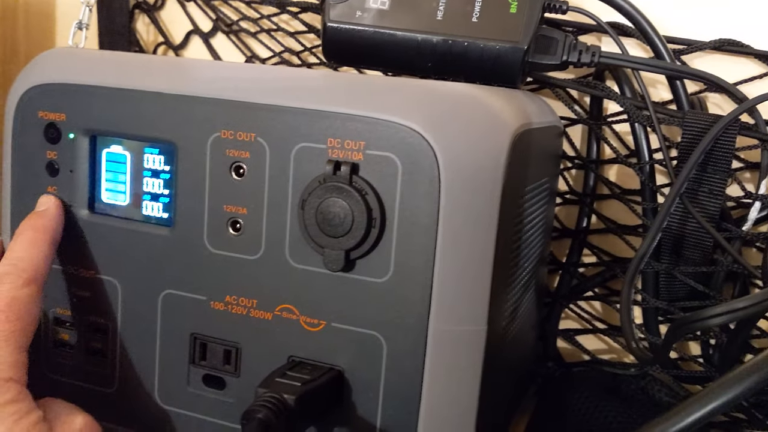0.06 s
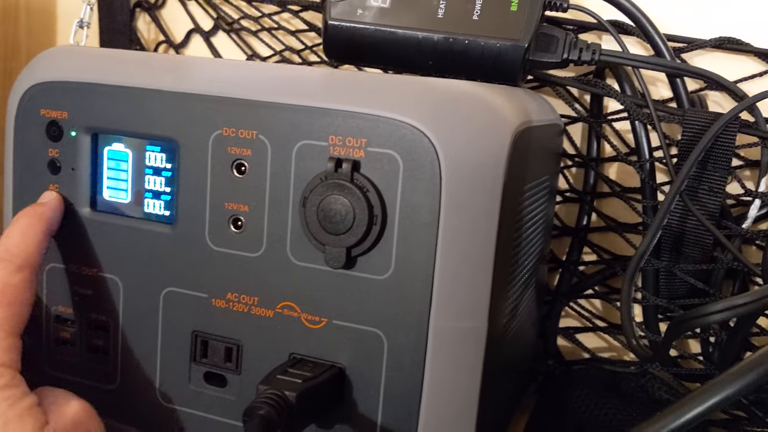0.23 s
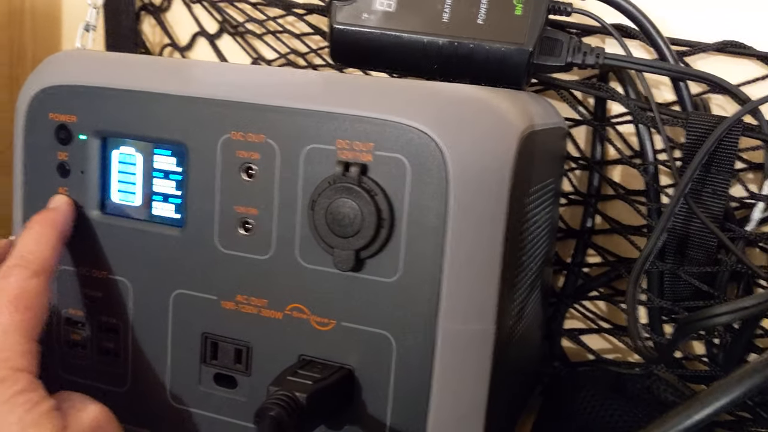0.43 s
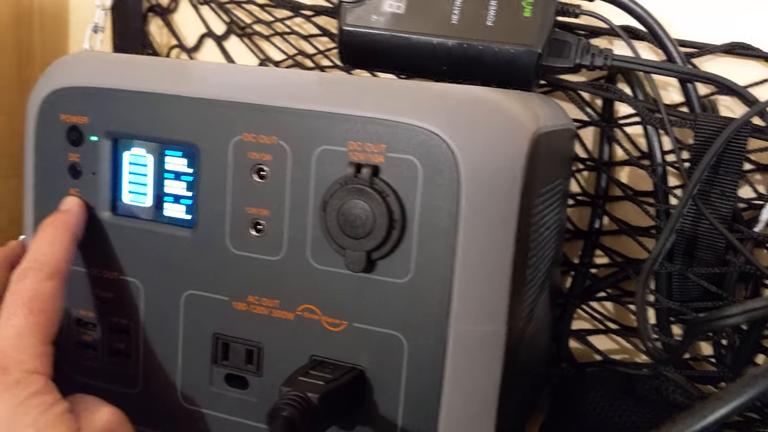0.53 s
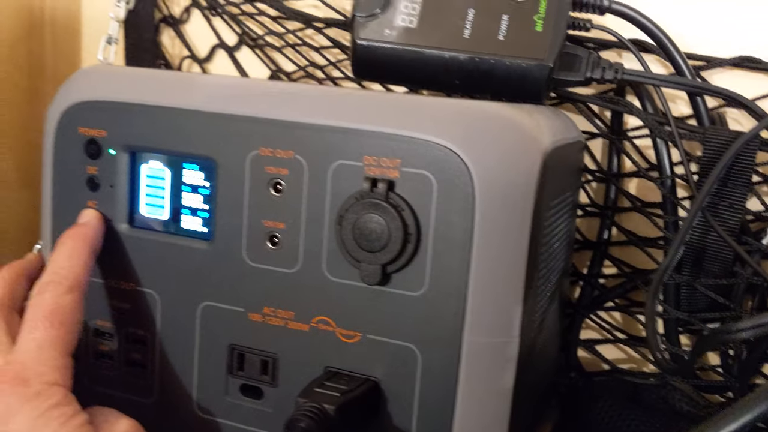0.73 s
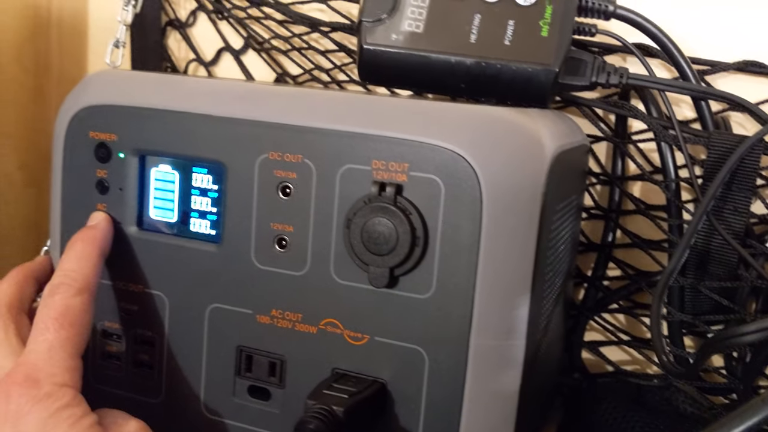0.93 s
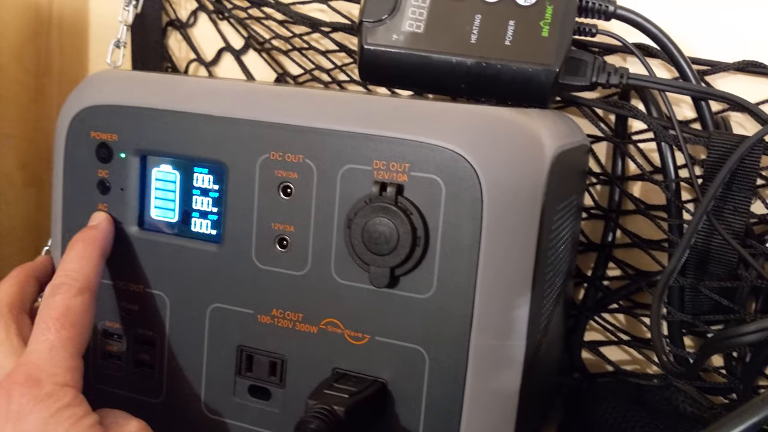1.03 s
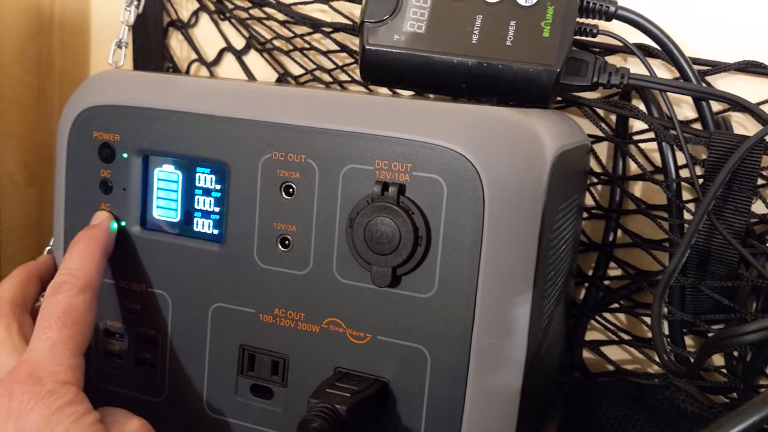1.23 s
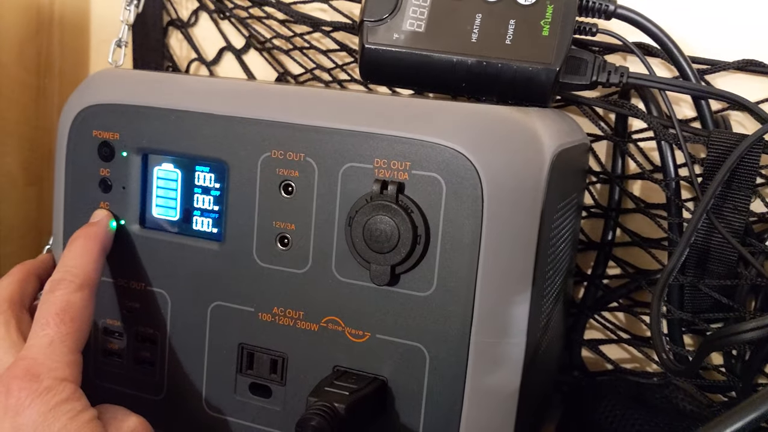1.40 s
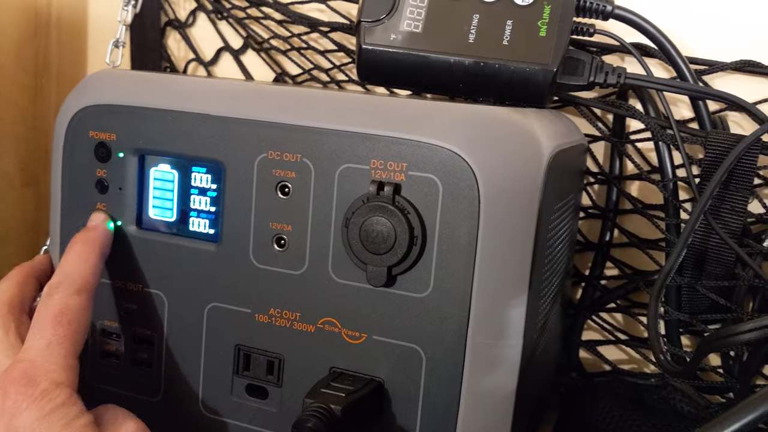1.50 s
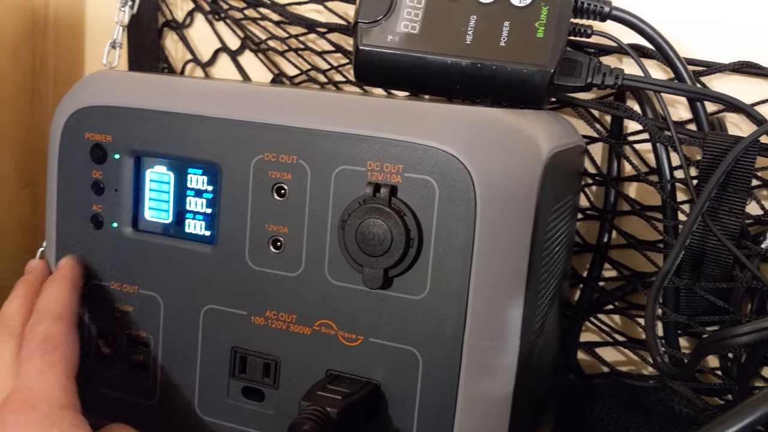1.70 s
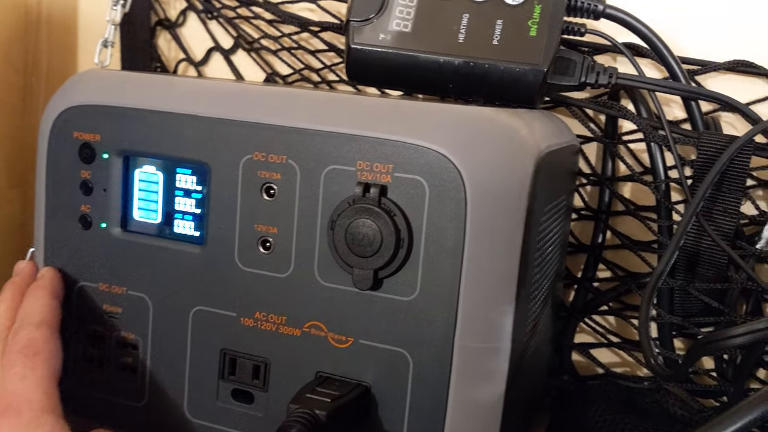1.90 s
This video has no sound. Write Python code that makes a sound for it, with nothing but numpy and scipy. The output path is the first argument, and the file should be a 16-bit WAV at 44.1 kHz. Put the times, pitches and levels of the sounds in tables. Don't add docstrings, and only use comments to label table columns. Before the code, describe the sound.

Close stereo pickup of a button on a hollow plastic battery box: one strong sharp click early, faint finger taps, then a brighter double click with tiny chatter, over quiet hum, fan air and hiss in a small cabin.

```python
import sys
import numpy as np
from scipy import signal
from scipy.io import wavfile
from scipy.ndimage import uniform_filter1d

SR = 44100
rng = np.random.default_rng(int(sys.argv[2]) if len(sys.argv) > 2 else 0)


def linear_from_db(decibels):
    return 10 ** (np.asarray(decibels, float) / 20)


def master(y):
    cut = np.clip(np.atleast_2d(y).T, -1, 1)
    pcm = np.round(cut * 32767)
    wavfile.write(sys.argv[1], SR, pcm.astype(np.int16))


N = 85995
EDGE_HZ = 15850
PORT_SIGNS = np.array([[1], [-1]])

# f/Hz, left minus right level/dB
STRUCK_TILT = [(200, -2), (700, 0.33), (1400, -0.5), (2800, 0.5), (4500, 0.5), (9000, -6), (14000, 0.5)]
# f/Hz, correlation [0 to 1]
PORT_LIKENESS = [(60, 0.9135), (150, 0.5071), (380, 0.9768), (950, 0.0442), (2380, 0.0242), (5980, 0.042),
                 (15000, 0.017)]


def evened(x):
    return x / np.sqrt(np.mean(x ** 2) + 1e-20)


def read(points, hz):
    f, value = np.transpose(points)
    return np.interp(np.log(hz + 1), np.log(f + 1), value)


def curve(points):
    s, value = np.transpose(points)
    return np.interp(np.arange(N) / SR, s, value)


def add(mix, s, sound):
    part = mix[..., round(s * SR):][..., :sound.shape[-1]]
    part += sound[..., :part.shape[-1]]


def noise(shape, size, patchy_db, alike):
    # f/Hz, left minus right level/dB
    port_tilt = [(60, 1), (180, -3.5), (550, -.5), (1650, -2.5), (4970, -3.5), (15000, -7.5)]
    air_lag_s = .0001
    frames, hz = 4 * N // size + 5, np.fft.rfftfreq(size, 1 / SR)
    a, b, c, d, patches = rng.standard_normal((frames, len(hz), 5)).T
    patches = uniform_filter1d(patches, size=9, axis=0)
    patches = evened(uniform_filter1d(patches, size=9, axis=1))

    same = np.clip(alike * read(PORT_LIKENESS, hz), -1, 1)[:, None]
    left = a + 1j * b
    right = same * left + np.sqrt(1 - same ** 2) * (c + 1j * d)
    right = right * np.exp(2j * np.pi * air_lag_s * hz)[:, None]

    tilt = linear_from_db(read(port_tilt, hz) / 2)[:, None]
    outside = (hz < shape[0][0]) | (hz > shape[-1][0])
    gain = linear_from_db(read(shape, hz) - 60 * outside)[:, None] * linear_from_db(patchy_db * patches)
    spectra = np.array([left * tilt, right / tilt]) * gain
    return evened(signal.istft(spectra, nperseg=size, noverlap=3 * size // 4)[1][:, :N])


def ring(hz, db, t60, rise, turn, bend=1):
    # f/Hz, delay of each port either way/s
    mode_lag = [(210, .00009), (400, -.00005), (750, -.00016), (1300, -.00024), (2600, .00013),
                (4400, -.0002)]
    lag = read(mode_lag, hz) * PORT_SIGNS
    t = np.maximum(np.arange(SR // 8) / SR - np.maximum(lag, 0), 0)
    tilt = linear_from_db(read(STRUCK_TILT, hz) / 2 * PORT_SIGNS)
    decay = linear_from_db(db - 60 * (t / t60) ** bend)
    onset = (1 - np.exp(-t / rise)) ** 2
    return tilt * decay * onset * np.sin(2 * np.pi * (hz * t + turn))


def crack(bright_db):
    # f/Hz, level/dB per Hz
    crack_spectrum = [(700, -17), (1250, -13.5), (2600, -7), (4600, -7.5), (6000, -9.5), (8000, -12.5),
                      (12000, -12), (14500, -20.5), (16000, -15.5)]
    # f/Hz, t60/s
    crack_decay = [(800, 0.08166), (4000, 0.058315), (9000, 0.0526), (16000, 0.0217)]
    lag_s, rise_s = 0.00026, 0.0011327
    burst_db, burst_s = 9, 0.003068
    n = SR // 8
    w = rng.standard_normal((3, n))
    common = np.array([w[0], np.roll(w[0], round(lag_s * SR))])
    w = 0.5051 * common + 0.9302 * w[1:]

    hz, t, z = signal.stft(w, SR, nperseg=128)
    tilt = read(STRUCK_TILT, hz) / 2 * PORT_SIGNS
    spectrum_db = read(crack_spectrum, hz) + bright_db * (hz / EDGE_HZ) ** 2 + tilt
    decay_db = 60 * t / read(crack_decay, hz)[:, None]
    z = z * linear_from_db(spectrum_db[:, :, None] - decay_db)

    x, t = signal.istft(z, SR, nperseg=128)[1][:, :n], np.arange(n) / SR
    x = x / x[:, :SR // 100].std()
    return x * (1 - np.exp(-t / rise_s)) * linear_from_db(burst_db * np.exp(-t / burst_s))


def buttons():
    snap_times = [.2119, 1.622, 1.6382, 1.6718, 1.6827]
    slip_delays = [.0012, .006, .0046, .004, .0035]
    # snap level/dB, case level/dB, crack above panel rings/dB, brightness at the top/dB
    snap_levels = [
        (-23, -31, -1, -0.5),
        (-49.5, -59, -4, -15.5),
        (-30.5, -31, 1.5, 5.5),
        (-57, -58.5, 9, -2),
        (-43, -62, 5, 0),
    ]
    # f/Hz, level/dB, t60/s
    panel_modes = [(1206, -13, .04), (1830, -13, .05), (2380, -13, .03), (2630, -7, .045), (2800, -7, .04),
                   (3320, -7, .035), (3490, -7, .035), (4150, -5, .04), (4460, -3, .04), (4650, -9, .045),
                   (4900, -8, .04), (5110, -10, .035), (6460, -14, .03), (7390, -11, .025)]
    # f/Hz, level/dB, t60/s, rise/s
    case_modes = [(209.78, -8.5, 0.052394, 0.005837), (404.04, -24, 0.05949, 0.003576),
                  (542.39, -13.5, 0.05186, 0.005109), (745, -1.5, 0.028199, 0.002879),
                  (970.71, -17, 0.03143, 0.006098), (1184.7, -17, 0.04215, 0.003073),
                  (1310.1, -15.5, 0.02474, 0.000562)]
    # f/Hz, level/dB per Hz
    cabin_spectrum = [(110, -39.5), (160, 5.5), (300, -3), (430, -9.5), (800, -5.5)]
    slip_db, panel_rise_s = -5.5, 0.0001129
    case_bend = 2.3
    cabin_db, cabin_t60, cabin_rise_s = -16, 0.1919, 0.010426

    mix, t = np.zeros((2, N)), np.arange(SR // 4) / SR
    cabin = noise(cabin_spectrum, size=1024, patchy_db=6.5, alike=0.633)
    for s, slip, (snap_db, case_db, crack_db, bright_db) in zip(snap_times, slip_delays, snap_levels):
        for at, db in ((s, snap_db), (s + slip, snap_db + slip_db)):
            panel = sum(ring(hz, d, t60, panel_rise_s, rng.random() / 4) for hz, d, t60 in panel_modes)
            add(mix, at, linear_from_db(db) * (panel + linear_from_db(crack_db) * crack(bright_db)))
        case = sum(ring(hz, d, t60, rise, rng.random() / 4, case_bend) for hz, d, t60, rise in case_modes)
        add(mix, s, linear_from_db(case_db + 12.0) * case)
        swell = 1 - np.exp(-t / cabin_rise_s)
        boom = linear_from_db(case_db + 15 + cabin_db - 60 * t / cabin_t60) * swell
        add(mix, s, boom * cabin[:, round(s * SR):][:, :len(t)])
    return mix


def dome():
    # t/s, level/dB, f/Hz
    bounces = [(0.2123, 0, 4224), (.213, -6, 4497), (.2139, -10.5, 4986), (0.215, -8.5, 4693),
               (0.2172, -7.5, 4164), (0.2177, -10, 4885), (.219, -25, 4409), (0.2208, -20, 4189),
               (0.2231, -20, 4247), (1.6244, -38.5, 4484), (1.627, -29, 4309), (1.631, -32.5, 4600),
               (1.6345, -32.5, 4372), (1.638, -13.5, 4101), (1.6382, -11.5, 4375), (1.64, -14, 4727),
               (1.6411, -15, 4522), (1.6428, -18, 4429), (1.6437, -12, 4499), (1.6444, -23, 4683),
               (1.6448, -21, 4505), (1.6489, -23, 4326), (1.6837, -19.5, 4138), (1.6845, -25, 4292),
               (1.6848, -24.5, 4175), (1.6871, -24.5, 4389), (1.6874, -29, 4576), (1.6911, -31, 4258)]
    mix = np.zeros((2, N))
    for s, db, hz in bounces:
        add(mix, s, ring(hz, db, t60=.0048, rise=.00025, turn=0))
    left_db = -3.
    return mix * linear_from_db([[left_db], [0]])


def touches():
    # t/s, level/dB, f/Hz, t60/s
    contacts = [(.509, -51, 338.8, 0.04699), (.512, -50, 526.9, 0.03126), (.565, -50.5, 745, 0.0366),
                (1.056, -54, 3561, 0.01942), (1.056, -49.5, 2186, 0.02127), (1.075, -51, 1910, 0.04706),
                (1.1163, -42.5, 3401, 0.01587), (1.117, -42, 2925, 0.02112), (1.117, -51.5, 4385, 0.01527),
                (1.119, -52.5, 2570, 0.0498), (1.117, -45, 801, 0.03388), (1.124, -46.5, 818.8, 0.06637),
                (1.124, -40.5, 349.4, 0.08235), (1.132, -47, 1456, 0.03208), (1.15, -51.5, 625.6, 0.1201),
                (1.181, -43, 1277, 0.03243), (1.186, -48, 451.1, 0.0313), (1.177, -53, 2366, 0.02133),
                (1.208, -43.5, 1385, 0.0481), (1.212, -57.5, 707.3, 0.03375), (1.59, -54.5, 765.3, 0.428),
                (1.639, -33.5, 991.6, 0.08233), (1.641, -25.5, 1287, 0.04666), (1.684, -39.5, 1365, 0.052),
                (1.724, -46, 494.6, 0.03544)]
    cluster = 1.45
    mix = np.zeros((2, N))
    for s, db, hz, t60 in contacts:
        spread = rng.uniform(-0.95244, 1, (9, 2))
        spread[0] = 0
        for k, turn in spread:
            mode_db = db - 6 * abs(k) - 8 * (k != 0)
            add(mix, s, ring(hz * cluster ** k, mode_db, t60, .001, turn))
    return mix


def rubbing():
    # t/s, level/dB
    sliding = [(0, -67.5), (.5, -66.5), (.57, -57.5), (.65, -62.5), (.8, -57), (.95, -61), (1.05, -63),
               (1.3, -70), (1.37, -57.5), (1.45, -93.5), (1.6, -70), (1.72, -59.5), (1.79, -48.5),
               (1.83, -54), (1.9, -67), (1.95, -57.5)]
    # f/Hz, level/dB per Hz
    skin_spectrum = [(1000, -2.5), (1400, -8.5), (2900, -1.5), (5000, -2), (7500, -6.5), (11700, 0.5),
                     (14000, -6), (15800, -7)]
    return linear_from_db(curve(sliding)) * noise(skin_spectrum, size=256, patchy_db=2.5, alike=0.82)


def fuzzy(hz, width):
    r = np.exp(-np.pi * width / SR)
    z = rng.standard_normal((3, 2 * N)) + 1j * rng.standard_normal((3, 2 * N))
    z = signal.lfilter([1 - r], [1, -r], z)
    z = signal.lfilter([1 - r], [1, -r], z)[:, N:]
    same = np.clip(read(PORT_LIKENESS, hz), 0, 1)
    z = np.sqrt(same) * z[0] + np.sqrt(1 - same) * z[1:]
    carrier = np.exp(2j * np.pi * hz * np.arange(N) / SR)
    return evened((z * carrier).real)


def transformer_hum():
    # t/s, level/dB
    hum_level = [(0, -64), (.5, -74.5), (.85, -62.5), (.95, -57.5), (1.04, -65.5), (1.12, -74), (1.45, -65),
                 (1.7, -59), (1.95, -58.5)]
    hum_hz = 124.88
    steady = np.sin(2 * np.pi * hum_hz * np.arange(N) / SR)
    return linear_from_db(curve(hum_level)) * (steady * 2.312 + 0.8357 * fuzzy(hum_hz, width=4.815))


def fan():
    # t/s, level/dB
    effort = [(0, -1), (.3, -3.5), (.6, 0.8981), (.85, 0.9939), (1., -1.5), (1.25, 3.5), (1.55, 1.5656),
              (1.95, 3.5)]
    # f/Hz, level/dB per Hz
    air_spectrum = [(270, -21.5), (330, -4), (480, -2), (800, -5.5), (1100, -13), (1500, -5.5), (2500, -13),
                    (4000, -30.5)]
    # f/Hz, bandwidth/Hz, level/dB
    whistles = [(98.4, 28.595, -56), (256.2, 8.475, -68.5), (488.4, 42.46, -75.5), (1428.4, 88.96, -68),
                (1871.9, 79.06, -69), (2175.8, 59.5, -77), (6960.5, 67, -77.5), (11004, 260, -75),
                (13890, 190, -69), (14790, 250, -70), (11767, 120, -77), (11112, 450, -79)]
    air = linear_from_db(-63.5) * noise(air_spectrum, size=1024, patchy_db=2.5, alike=0.71)
    tones = sum(linear_from_db(db) * fuzzy(hz, bandwidth) for hz, bandwidth, db in whistles)
    return linear_from_db(curve(effort)) * (air + tones)


def rumble():
    # f/Hz, level/dB per Hz
    rumble_spectrum = [(24, -53.5), (33, -24.5), (40, 1), (107, -4.5), (184, -5.5), (220, -13.5),
                       (260, -13), (300, -35)]
    # t/s, level/dB
    rumble_level = [(0.0, -49.5), (0.954, -50.5), (1.08, -53), (1.394, -49.5), (1.95, -46)]
    return linear_from_db(curve(rumble_level)) * noise(rumble_spectrum, size=4096, patchy_db=-3.0, alike=1.0322)


def hiss():
    # f/Hz, level/dB per Hz
    hiss_spectrum = [(250, -8.5), (1000, -7.5), (3000, -8), (6000, -11.5), (9000, -12.5), (12000, -10),
                     (15750, -19), (15880, -42)]
    return linear_from_db(-57.5) * noise(hiss_spectrum, size=1024, patchy_db=1.4174, alike=0.435)


def scene():
    handled = buttons() + dome() + touches() + rubbing()
    return handled + transformer_hum() + fan() + rumble() + hiss()


def band_limit(x):
    return signal.sosfilt(signal.butter(12, 16630, fs=SR, output="sos"), x)


def record(dry):
    bass_cut = signal.butter(4, 34., "high", fs=SR, output="sos")
    treble_cut = signal.firwin(1023, EDGE_HZ, window=("kaiser", 9), fs=SR)
    cut = signal.sosfilt(bass_cut, dry)
    cut = signal.oaconvolve(cut, treble_cut[None], "same")
    return band_limit(cut)


dry = scene()
out = record(dry)
master(out)
```